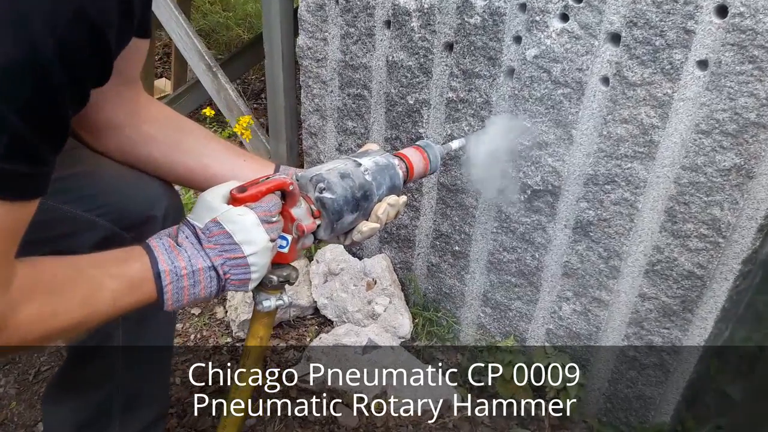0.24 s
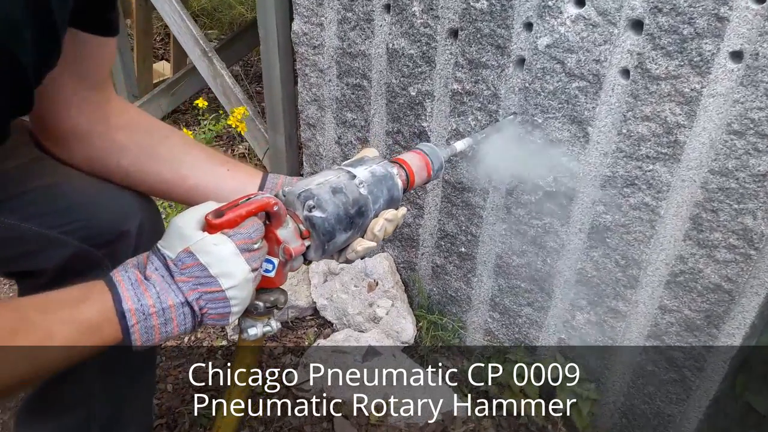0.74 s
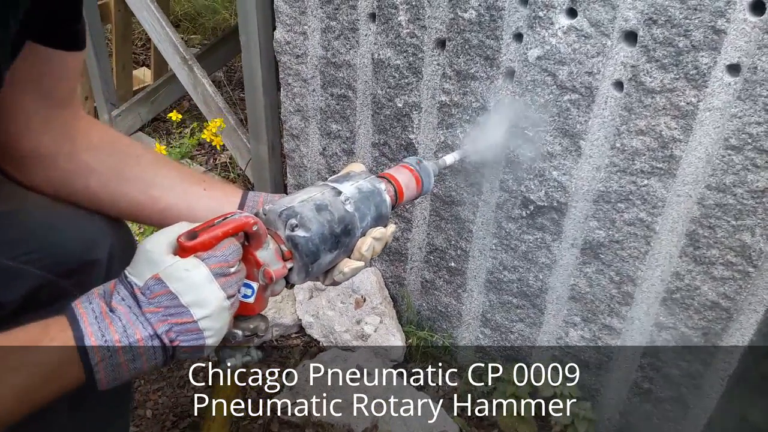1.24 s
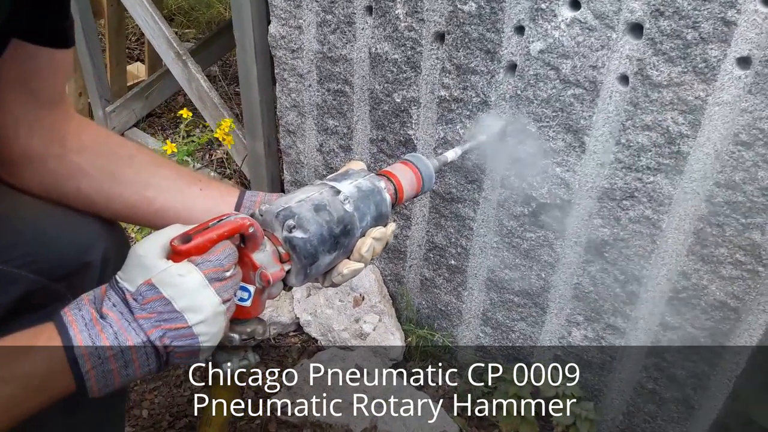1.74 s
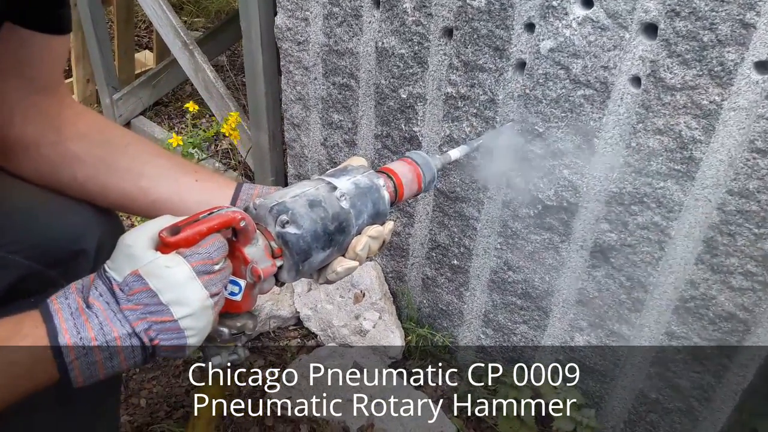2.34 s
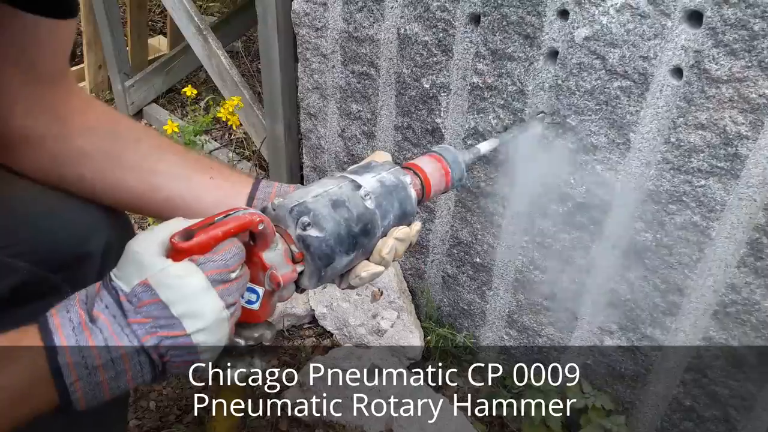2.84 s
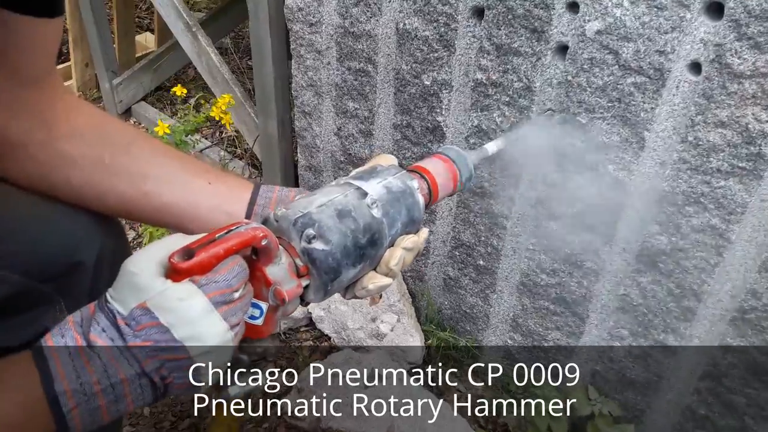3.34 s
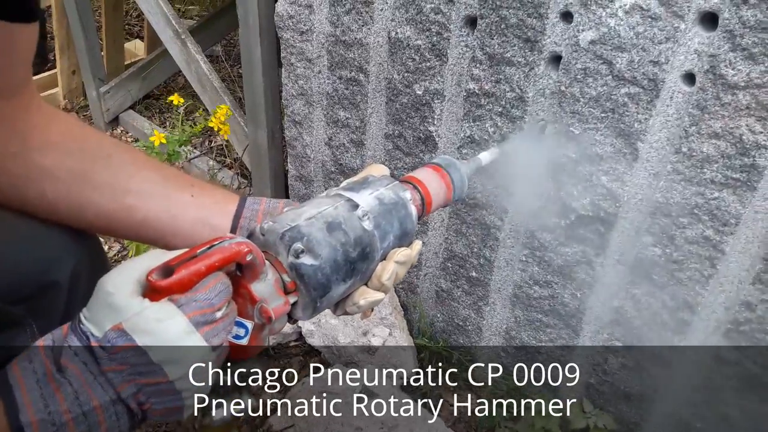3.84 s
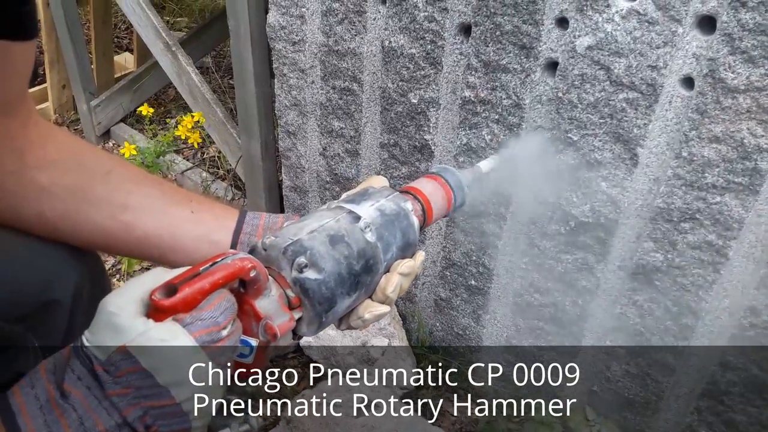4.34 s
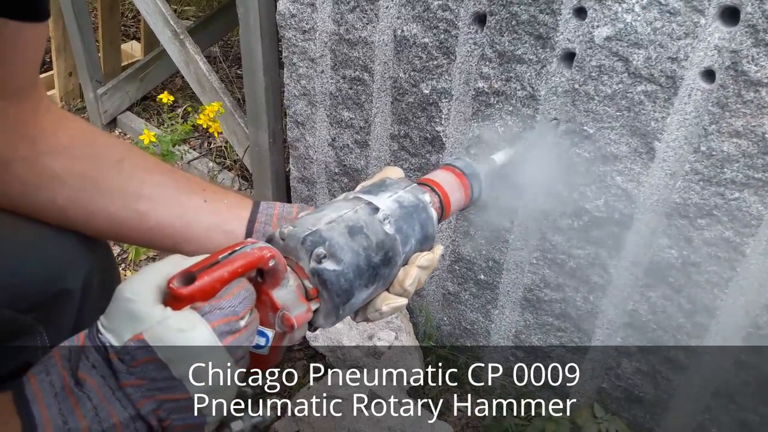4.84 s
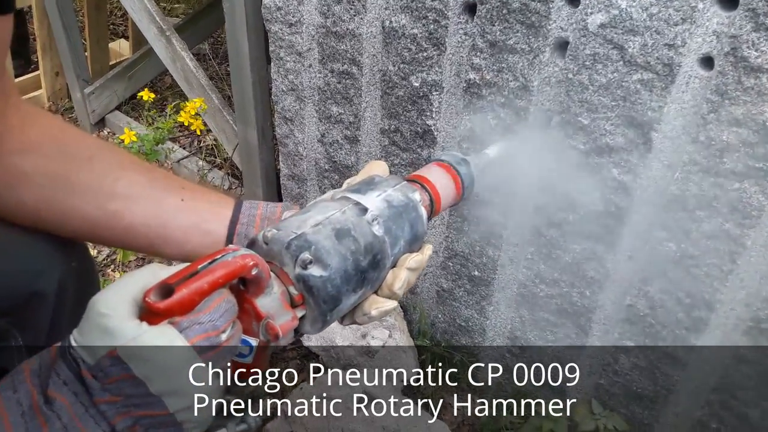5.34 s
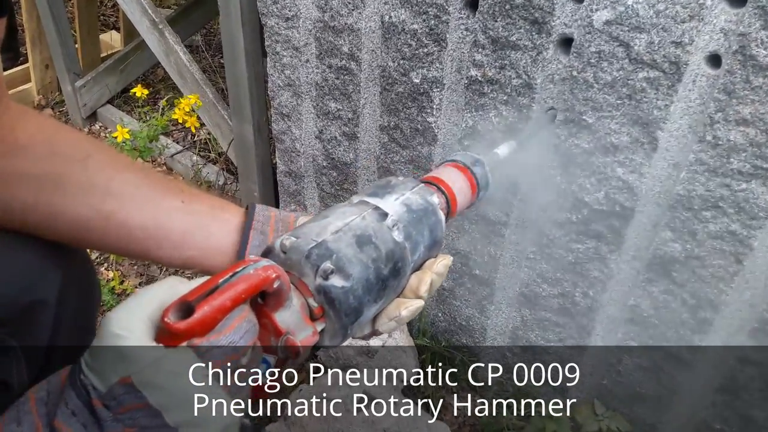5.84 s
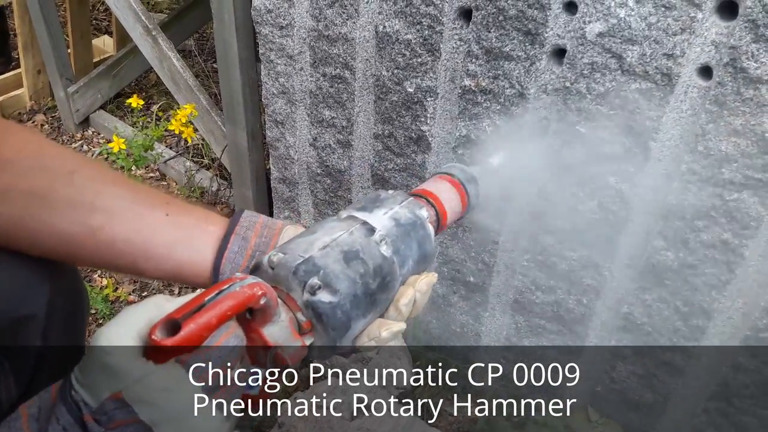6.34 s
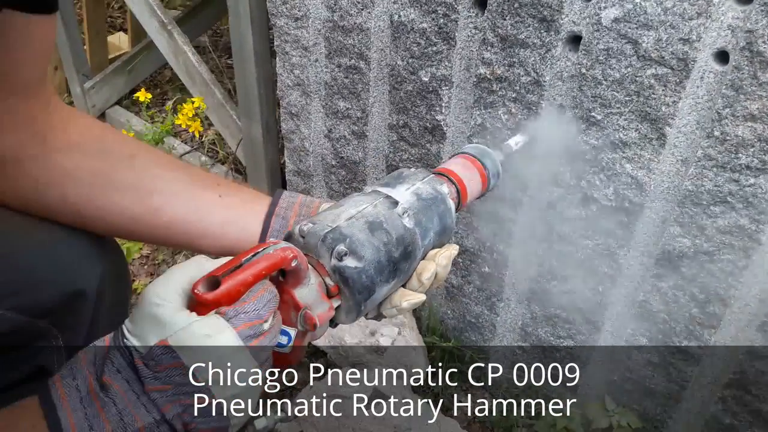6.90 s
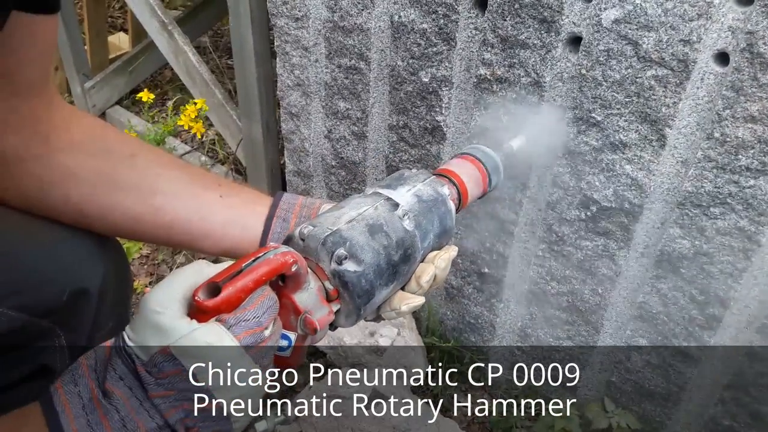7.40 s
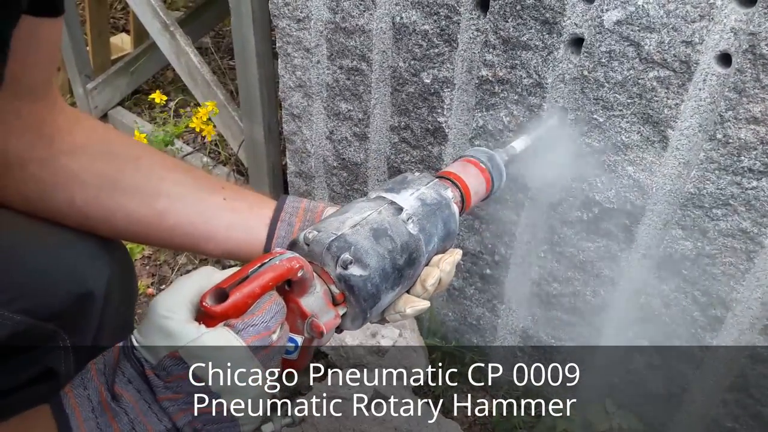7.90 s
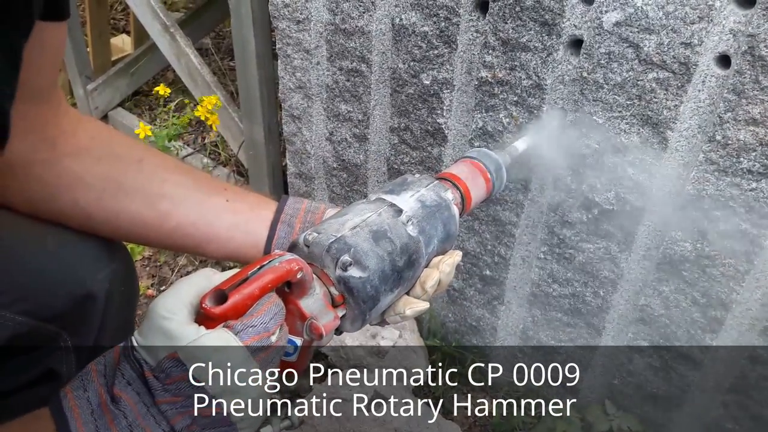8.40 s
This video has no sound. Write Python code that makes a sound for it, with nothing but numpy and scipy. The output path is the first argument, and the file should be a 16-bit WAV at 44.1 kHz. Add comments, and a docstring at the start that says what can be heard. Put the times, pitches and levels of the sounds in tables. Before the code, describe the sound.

A hand-held pneumatic hammer drill bores into stone close by, rattling and hissing, cutting out briefly near the end before resuming.

```python
"""A hand-held pneumatic hammer drill bores into granite outdoors, heard from close by.
From the start the piston hits the steel 56 times a second: the steel rings, grit is crushed, the housing
rattles, the chuck sings, the exhaust puffs and flushing air hisses. The tool grows louder as it is leaned
on, and slows as the hole deepens. At 6.9 s the sound cuts out; it fades back in from 7.3 s, and the
exhaust then blows across the microphones."""
import sys
import numpy as np
from scipy import signal
from scipy.fft import rfft, irfft
from scipy.io import wavfile

SR = 44100
rng = np.random.default_rng(int(sys.argv[2]) if len(sys.argv) > 2 else 0)


def put_to_file(sound):
    """Save the sound as 16-bit audio at rate SR, in the file named by the first command-line argument."""
    columns = np.atleast_2d(sound).T  # one column per channel
    safe = np.clip(columns, -1, 1)
    whole_steps = np.round(safe * 32767)
    wavfile.write(sys.argv[1], SR, whole_steps.astype(np.int16))


N = 381906
TIME = np.arange(N) / SR
CUT_S, RETURN_S, FULL_S = 6.906, 7.296, 7.55


def from_db(db):
    """Decibels to gain."""
    return np.exp(np.asarray(db) * (np.log(10) / 20))


def unit_rms(x):
    """Scale a stereo pair to mid rms 1."""
    return x / np.sqrt(np.mean(x.mean(axis=0) ** 2) + 1e-20)


def in_time(table):
    """Columns after t/s, interpolated to every sample."""
    times_s, *columns = np.transpose(table)
    return [np.interp(TIME, times_s, column) for column in columns]


def drift(rate_hz):
    """Smooth random curve, spread 1."""
    hop, settle = 40, 2000
    pole = np.exp(-2 * np.pi * rate_hz * hop / SR)
    noise = rng.standard_normal(N // hop + settle + 2)
    slow = signal.lfilter([1], [1, -2 * pole, pole * pole], noise)[settle:]
    return np.interp(np.arange(N) / hop, np.arange(len(slow)), slow / slow.std())


def stroke_random(cycles):
    """One random value per stroke, spread about 1."""
    return np.clip(rng.standard_normal(1024), -2, 2)[cycles.astype(int)]


def stroke_gain(cycles, spread_db):
    """One random gain per stroke."""
    return from_db(spread_db * stroke_random(cycles))


def turbulence(grain_db):
    """Stereo noise in clumps of about 1 ms."""
    return rng.standard_normal((2, N)) * from_db(grain_db * drift(450))


def colour(x, spectrum, size=8192):
    """Minimum-phase filter, one spectrum per channel."""
    hz, *sides_db = np.transpose(spectrum)
    log_hz = np.log(np.arange(size // 2 + 1) * SR / size + 1)
    gains = from_db([np.interp(log_hz, np.log(hz), db) for db in sides_db])
    cepstrum = irfft(np.log(gains))
    cepstrum[:, 1:size // 2] *= 2
    cepstrum[:, size // 2 + 1:] = 0
    impulse = irfft(np.exp(rfft(cepstrum)))
    return signal.oaconvolve(x, impulse, axes=1)[:, :N]


def resonance(x, hz, width_hz):
    """Two-pole band-pass, peak gain 1."""
    r = np.exp(-np.pi * width_hz / SR)
    feedback = [1, -2 * r * np.cos(2 * np.pi * hz / SR), r * r]
    return signal.lfilter(np.array([1, 0, -1]) * (1 - r * r) / 2, feedback, x)


def ring(contacts, hz, width_hz):
    """A mode shaken by dense contacts, too long to carry much far from its pitch."""
    return resonance(resonance(contacts, hz, width_hz * 6), hz, width_hz)


def throb(cycles):
    """Hum at the stroke rate, left only."""
    return np.cos(2 * np.pi * cycles + 1) * [[1], [0]]


def draught(effort_db, attack_s=0.076, release_s=0.038):
    """Gain of the air at the microphones: a light draught, then exhaust gusts."""
    # gusts: start/s, end/s, level/dB
    gusts = [(7.51, 8.13, -25), (8.15, 8.185, -20)]
    gain = from_db(-34.5 + effort_db)
    for start_s, end_s, db in gusts:
        rise = np.minimum(TIME - start_s, 0) / attack_s
        fall = np.maximum(TIME - end_s, 0) / release_s
        gain = np.maximum(gain, from_db(db) * np.exp(rise - fall))
    return gain


def buffet(gust, cycles, push=0.06):
    """Each puff arrives a little later as a low thud: a push of air with eddies on it."""
    # thud spectrum: f/Hz, left/dB, right/dB
    spectrum = [(15, -46.5, -45.5), (30, -34.5, -25), (60, -11.5, -17), (101, -1.5, -1), (135, -2, -3),
                (210, 0.5, -0.5), (330, -0.5, -5), (593, -9.5, -22.5), (2000, -40.5, -43.5)]
    pressure = (turbulence(grain_db=0.9) + push) * gust * stroke_gain(cycles, spread_db=1.5)
    return unit_rms(colour(pressure, spectrum))


def grinding(rattle):
    """The bit crushes grit with every blow, biting hardest early on."""
    # grit spectrum: f/Hz, left/dB, right/dB
    spectrum = [(1000, -38, -51.5), (3060, -18.5, -10), (3950, -13, -0.5), (4570, -11.5, -6.5),
                (5260, -5, 0), (6310, -11.5, -1.5), (6670, -23.5, -18), (7950, -7.5, -39),
                (16000, -24.5, -41.5)]
    # bite of the bit: t/s, level/dB
    bite = [(0, -29.5), (1.9, -26.5), (4.2, -33.5), (5.1, -33.5), (6.85, -29), (7.6, -38.5), (8.66, -39)]
    bite_db, = in_time(bite)
    return from_db(bite_db) * unit_rms(colour(turbulence(grain_db=4.5) * rattle, spectrum))


def bounce(cycles, hz, scatter_hz, rough=0.35):
    """A steel mode rings until the next blow chokes it; strength and pitch vary per bounce."""
    envelope = np.sqrt(np.abs(np.sin(np.pi * cycles))) * (1 + rough * drift(89))
    pitch_hz = hz + scatter_hz * stroke_random(cycles)
    phase = 2 * np.pi * np.cumsum(pitch_hz) / SR + rough * drift(150)
    # the turning steel radiates differently to each microphone
    sides = [np.sin(phase + np.pi * stroke_random(cycles)) * stroke_gain(cycles, spread_db=1)
             for side in "LR"]
    return np.array(sides) * envelope * stroke_gain(cycles, spread_db=1)


def steel(cycles, release_cycles=0.45, seating_db=2.5, seating_hz=4.5):
    """The steel rings as it bounces free of the stone; the mode mix shifts as it reseats."""
    # strong steel modes: f/Hz, scatter per blow/Hz, left minus right/dB
    modes = [(6964, 14, 0), (11208, 30, 8), (13995, 45, -2)]
    # ringing as the hole deepens: t/s, level/dB of modes 1, 2, 3
    ringing = [(0, -37, -38, -39), (2.1, -37, -28.5, -33), (4.1, -32, -35, -29.7), (5.8, -32, -35, -33.5),
               (6.85, -36, -35, -36), (7.6, -39.5, -33, -44), (8.66, -38, -32, -42)]
    out = 0
    for (hz, scatter_hz, pan_db), level_db in zip(modes, in_time(ringing)):
        mode = bounce(cycles - release_cycles, hz, scatter_hz) * from_db(seating_db * drift(seating_hz))
        out = out + from_db(level_db) * unit_rms(mode * from_db([[pan_db / 2], [-pan_db / 2]]))
    return out


def singing_db(turn_hz=3.6, swell_db=1.5, slip_turns=0.15, flare_s=0.035):
    """Chuck level: a slow rise, a swell on each uneven turn of the steel, a few flares."""
    # singing as the steel sinks in: t/s, level/dB
    trend = [(0, -24), (1.8, -28), (3.0, -25.5), (5.6, -23), (6.85, -21.5), (8.66, -19)]
    # brief flares: t/s, rise/dB
    flares = [(2.87, 6.5), (3.17, 6), (3.46, 9), (4.73, 5.5), (8.0, 8)]
    trend_db, = in_time(trend)
    turns = turn_hz * TIME + slip_turns * drift(1)
    flares_db = sum(rise_db * np.exp(-((TIME - at_s) / flare_s) ** 2) for at_s, rise_db in flares)
    return trend_db + swell_db * np.cos(2 * np.pi * turns) + flares_db


def chuck(rattle, cycles, notes_hz=(3476, 3503), left_db=-22):
    """The rattled chuck sings one note, slightly higher after the cut."""
    contacts = turbulence(grain_db=-0.2) * rattle * stroke_gain(cycles, spread_db=1.5)
    early, late = [ring(contacts, hz, width_hz=100) for hz in notes_hz]
    return unit_rms(np.where(TIME < RETURN_S, early, late) * from_db([[left_db], [0]]))


def flushing_air(flow):
    """Air blows dust out of the hole, pulsing with the strokes."""
    # hiss spectrum: f/Hz, left/dB, right/dB
    spectrum = [(150, -26, -19.5), (590, -7, -2), (1610, 2.5, 9), (3000, 2.5, 1.5), (4200, 3.5, 7.5),
                (5800, -2, 1), (6550, -1, 0), (7740, -0.5, -16), (8040, 8.5, -28.5), (8800, 3.5, -36.5),
                (9750, -1, -7.5), (11100, 5.5, -1.5), (13200, 2.5, 4), (15700, 5, 1)]
    jet = turbulence(grain_db=1.5) * flow * from_db(0.97 * drift(25))
    return unit_rms(colour(jet, spectrum))


def housing_and_rod(rattle, cycles):
    """Each blow sets the housing and steel rod rattling; three separate rattles are dealt in turn to their
    modes."""
    # housing modes (2.9-4.3 kHz), steady ringing of the steel rod (5.3-9.6 kHz):
    # f/Hz, width/Hz, left/dB, right/dB
    modes = [(2894, 360, -14.5, -7), (3000, 170, -18, -5.5), (3220, 220, -19, -3), (3790, 360, -29.5, -5.5),
             (4290, 170, -19.5, -5), (5306, 79, -15, -9.5), (6970, 250, -14.5, -16), (8140, 42, -7, -23.5),
             (9630, 110, -21, -34.5)]
    rattle_noises = [turbulence(grain_db=0.8) * rattle * stroke_gain(cycles, spread_db=1.6)
                     for _ in range(3)]
    return unit_rms(sum(from_db([[left_db], [right_db]]) * ring(rattle_noises[k % 3], hz, width_hz)
                        for k, (hz, width_hz, left_db, right_db) in enumerate(modes)))


def exhaust(puff, cycles):
    """The port opens once a stroke: a ragged blast with a hollow ring towards the left."""
    # blast spectrum: f/Hz, left/dB, right/dB
    spectrum = [(99, -31, -19), (214, -9.5, -10), (375, -1, -3.5), (750, 1, -1.5), (1110, 0.5, -2.5),
                (1800, -1, -2.5), (2460, -3, -6.5), (3085, -13, -2.5), (4500, -31.5, -29.5),
                (6500, -18, -33.5), (8500, -58, -50), (16000, -10, -39)]
    jet = turbulence(grain_db=1.55) * puff * stroke_gain(cycles, spread_db=0.95)
    blast = colour(jet, spectrum)
    hollow = from_db([[-12], [-30]]) * resonance(blast, hz=1180, width_hz=200)
    return unit_rms(blast + hollow)


def piston(start_hz=56.2, sag_hz_per_s=0.7):
    """Stroke count: slows with depth, wavers with the feed, jitters with the steel's rebound."""
    rate_hz = start_hz - sag_hz_per_s * TIME
    return np.cumsum(rate_hz) / SR + 0.1 * drift(1.31) + 0.02 * drift(15) + 0.016 * drift(35)


def scene(waver_hz=3.6):
    """The piston times all sources; air and rattle levels follow the effort."""
    # one stroke: phase/cycles, exhaust/dB, rattle/dB, flushing air/dB, buffet/dB
    stroke = [(0, -21.5, -13.5, -3.5, -9), (.135, -20.5, -13.5, -0.5, -10.5),
              (.175, -7.5, -1.7, -5.5, -7.5), (.28, -11, -2, 0.5, -4.5), (.36, 1.5, 1, -3, 2),
              (.48, -4, -2.5, -3.3, 4.5), (.6, -5, -5, -4.5, 1), (.72, -9.5, -2.5, -9.5, 0),
              (.86, -13, -10.5, -6, -10)]
    # tool leaned on harder and coming nearer: t/s, level/dB
    effort = [(0, -4.5), (2, -3), (4, -1.5), (6, -0.2), (8.66, -0.9)]
    cycles = piston()
    phase, *shapes_db = np.transpose(stroke)
    force = stroke_gain(cycles, spread_db=0.5)
    puff, rattle, flow, gust = [force * from_db(np.interp(cycles % 1, phase, db, period=1))
                                for db in shapes_db]
    effort_db, = in_time(effort)
    mix = from_db(effort_db) * (from_db(-20) * exhaust(puff, cycles) + from_db(-47.5) * throb(cycles))
    rattle_db = -20.5 + 0.37 * effort_db + 1.3 * (TIME > RETURN_S) - 0.1 * drift(waver_hz)
    mix += from_db(rattle_db) * housing_and_rod(rattle, cycles)
    mix += from_db(singing_db()) * chuck(rattle, cycles)
    mix += grinding(rattle)
    air_db = -21.5 + 0.58 * effort_db - 0.47 * drift(waver_hz)
    mix += from_db(air_db) * flushing_air(flow)
    mix += steel(cycles)
    return mix + draught(effort_db) * buffet(gust, cycles)


def limiter(x, knee_db=-7, window_s=0.0012):
    """Fast per-channel gain control evens out the loudest blows."""
    pole = np.exp(-1 / (window_s * SR))
    power = signal.lfilter([1 - pole], [1, -pole], x ** 2)
    return x / np.sqrt(np.hypot(1, power / from_db(knee_db) ** 2))


def record(dry, ceiling=0.92, cutoff_hz=15730):
    """Limiter, soft clip, cut and fade-in, steep low-pass."""
    held = limiter(dry)
    rounded = held / (1 + np.abs(held / ceiling) ** 8) ** (1 / 8)
    fade_in = np.clip((TIME - RETURN_S) / (FULL_S - RETURN_S), 0, 1)
    gate = np.where(TIME < CUT_S, 1, fade_in)
    lowpass = signal.ellip(14, 0.1, 80, cutoff_hz, fs=SR, output="sos")
    return signal.sosfilt(lowpass, rounded * gate + 1e-18)


dry = scene()
out = record(dry)
put_to_file(out)
```